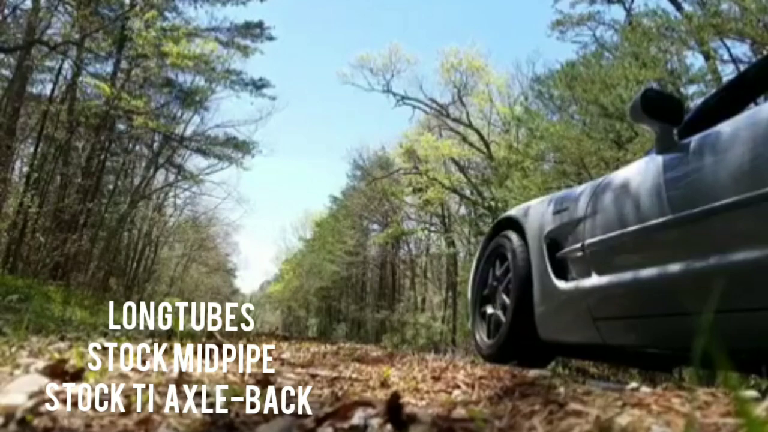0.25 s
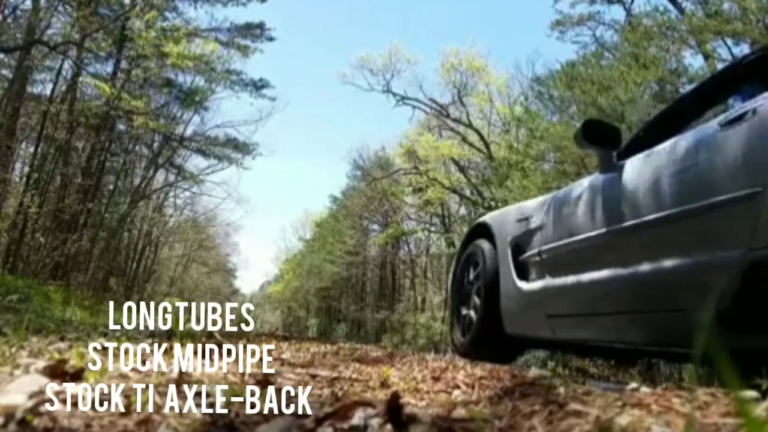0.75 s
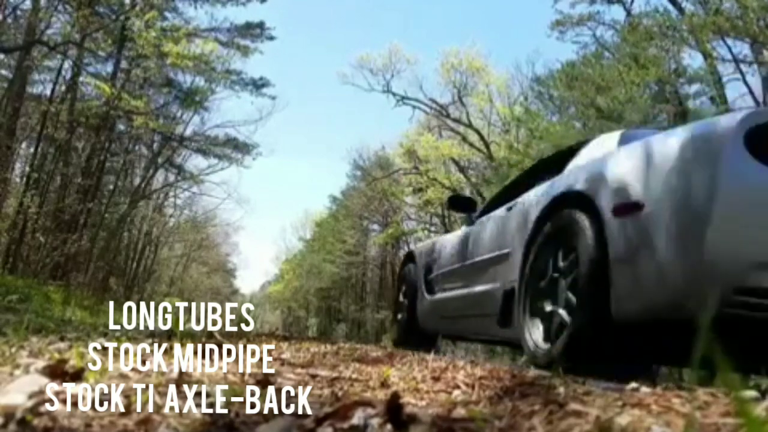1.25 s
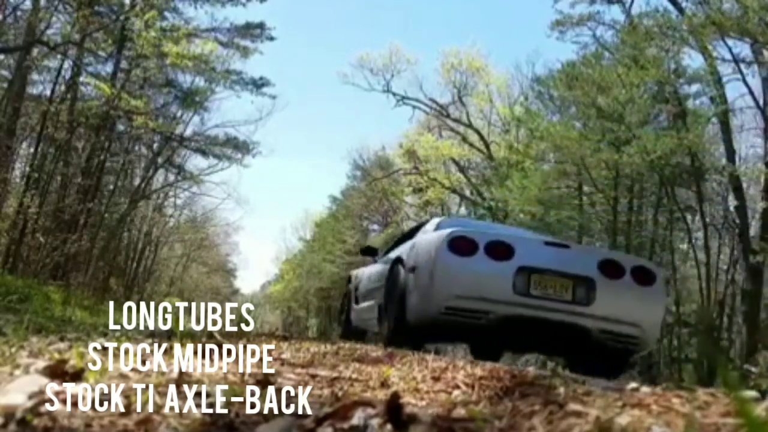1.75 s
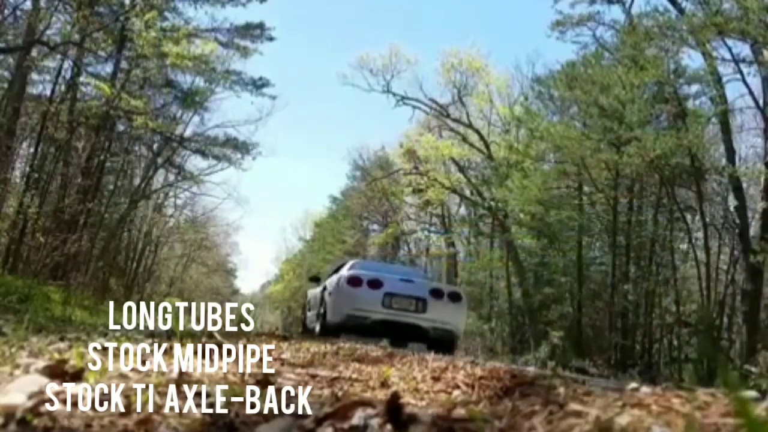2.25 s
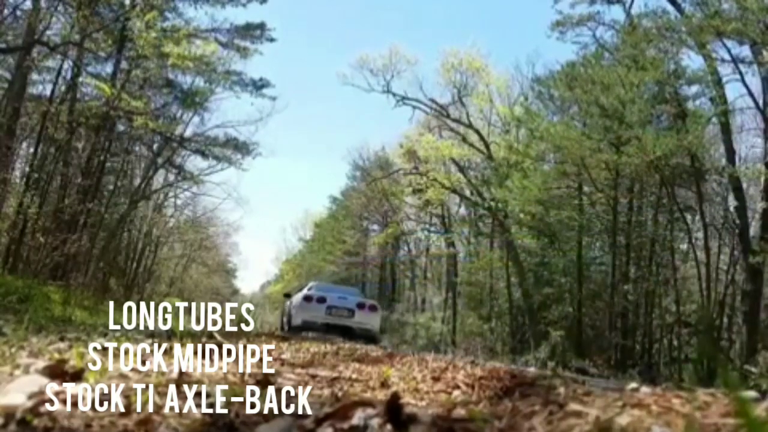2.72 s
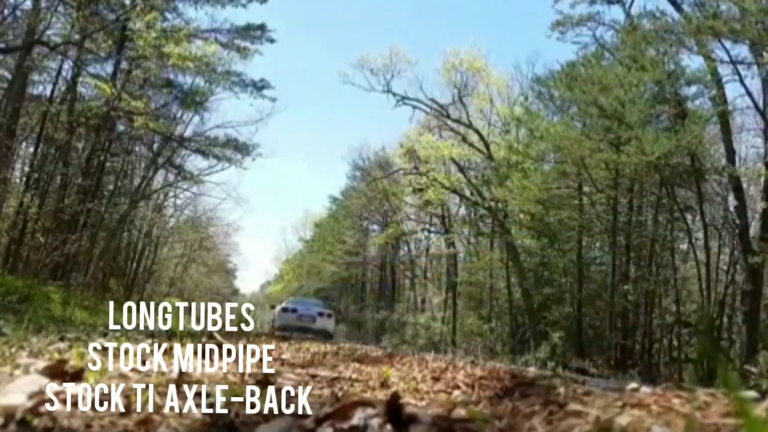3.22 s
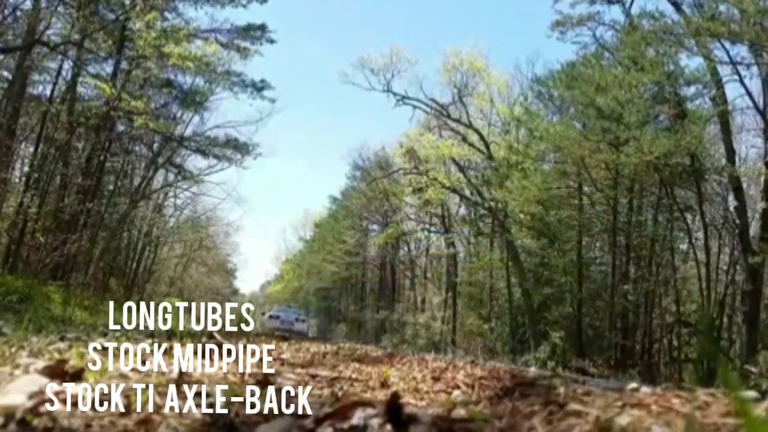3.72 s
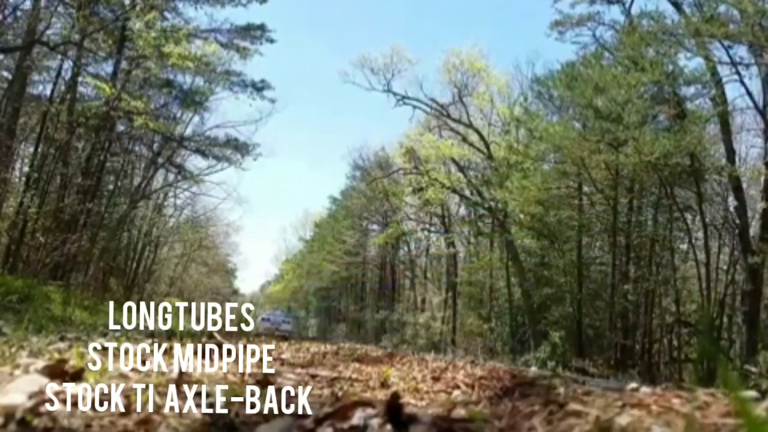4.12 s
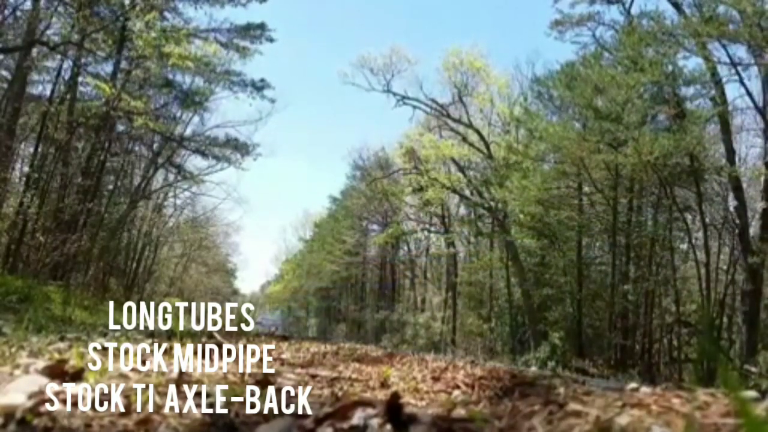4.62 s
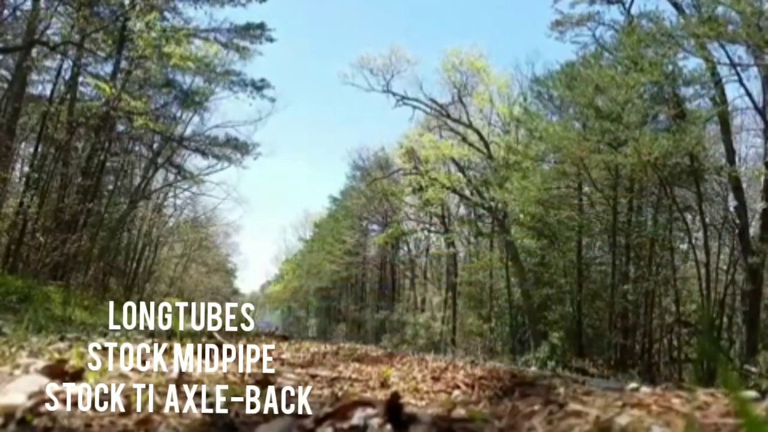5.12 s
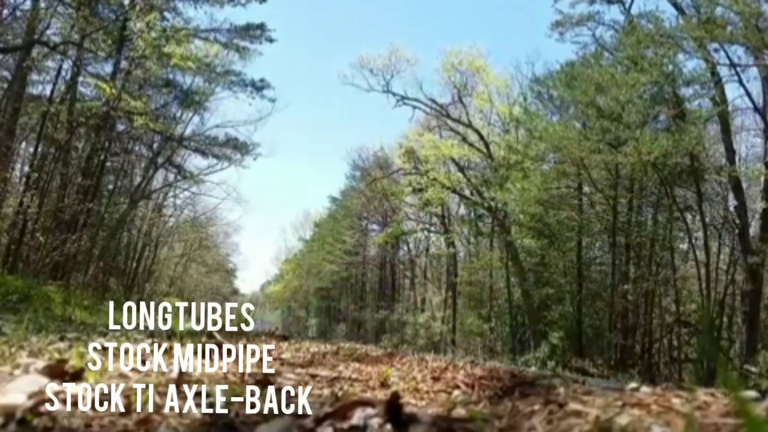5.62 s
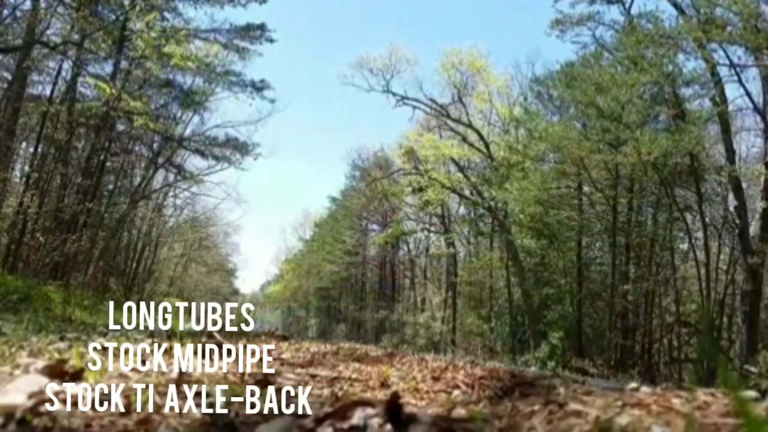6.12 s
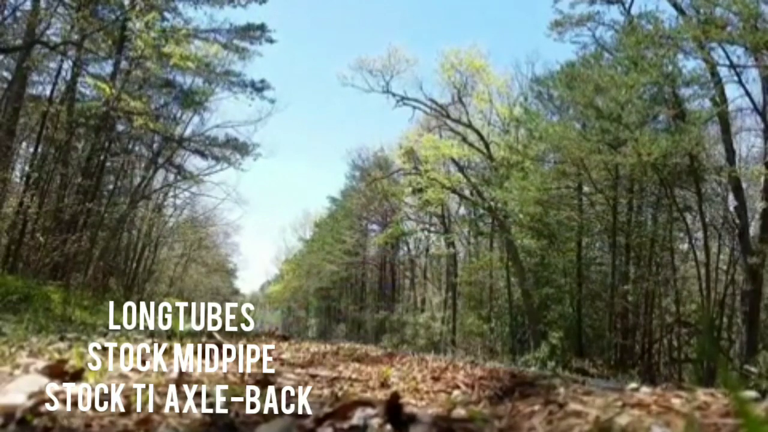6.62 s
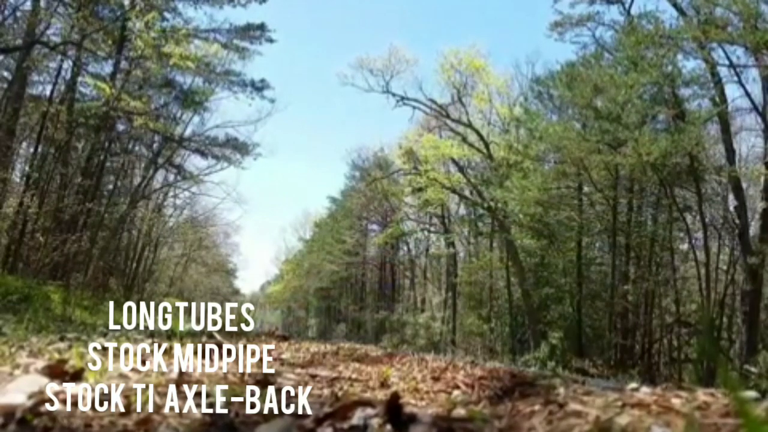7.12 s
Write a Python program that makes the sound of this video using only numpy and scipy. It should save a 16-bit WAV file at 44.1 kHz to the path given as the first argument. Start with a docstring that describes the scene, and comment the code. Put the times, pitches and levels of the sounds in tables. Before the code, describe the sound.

Grit crunches as a raspy V8 car launches close by, revs high, chirps its tyres on an upshift and roars on into the distance.

```python
"""Sports car leaving a wooded verge

A V8 rolls off the grit beside a stereo microphone on the ground and accelerates away down the road.
It revs out, shifts up with a few tyre chirps, pulls again, then shifts and runs on at lighter throttle.
The exhaust is a stack of engine orders gliding through pipe resonances, with rough, pulsing gas noise.
Tyres roar and hiss, grit crunches, a few sharp ticks sound at the start and the trees answer faintly."""
import sys
import numpy as np
from scipy import signal
from scipy.fft import rfft, irfft, next_fast_len
from scipy.io import wavfile
from scipy.ndimage import uniform_filter1d, minimum_filter1d, map_coordinates

SR = 44100
rng = np.random.default_rng(int(sys.argv[2]) if len(sys.argv) > 2 else 0)


def wrap_up_sound(samples):
    """Save the sound to the file named by the first command line argument, as 16-bit audio."""
    columns = np.atleast_2d(samples).T
    # keep every value between -1 and 1, then stretch to whole-number steps
    tamed = np.clip(columns, -1, 1)
    steps = np.round(tamed * 32767).astype(np.int16)
    wavfile.write(sys.argv[1], SR, steps)


N = 324727
TIME = np.arange(N) / SR


# the exhaust at the microphone, relative levels: (time [s], firing tones [dB], burble [dB], rasp [dB])
EXHAUST_LEVELS = [(0, -46.5, -56, -27.5), (.18, -31.5, -53.5, -23.5), (.28, -30.5, -55.5, -20),
                  (.47, -31.5, -40, -15.5), (.85, -32.5, -44, -18.5), (1.3, -24.5, -45.5, -16),
                  (1.47, -22.5, -46.5, -16.5), (1.58, -26, -37.5, -15), (1.9, -21.5, -43.5, -11),
                  (2.48, -22, -43.5, -14), (2.85, -20, -27, -18.5), (3.5, -22.5, -20, -12),
                  (4.03, -20, -21.5, -14), (4.4, -22, -27.5, -12), (5.05, -24, -25, -13),
                  (6.18, -19.5, -25, -14.5), (6.48, -22, -34, -12.5), (6.75, -17.5, -34.5, -16),
                  (7.36, -20, -36, -13.5)]
def exhaust(cycle, firing_hz, ragged, pull, shut, jolt):
    """Engine orders plus a puff of gas at every firing; ragged running trades pitched rasp for noise."""
    tone_db, burble_db, rasp_db = curves(EXHAUST_LEVELS)
    levels_db = tone_levels(tone_db, firing_hz, pull, shut, jolt)
    burble, rasp = cylinder_orders(cycle, firing_hz / 8, ragged, pull, shut)
    gas = gas_pulses(cycle)
    tones = np.sqrt(2) * firing_tones(cycle, levels_db, ragged)
    pitched = amp(-1) * tones + amp(burble_db + 1.2) * burble
    pitched += amp(rasp_db - 2.16) * np.sqrt(1 - ragged) * rasp
    return pitched + amp(rasp_db + 1.44) * np.sqrt(ragged) * gas


def firing_tones(cycle, levels_db, ragged):
    """The eight firings of a cycle add up to a tone with two strong overtones."""
    rounding = np.pi / 2 * swell(2.9, 0.7)  # crossing the main resonance turns the overtones' phases
    out = np.zeros(N)
    for order, db in zip((8, 16, 24), levels_db):
        phase = order * cycle + pipe_phase(order) + rounding * (order / 8 - 1) ** 2
        out -= amp(db + ragged * wobble(33)) * np.cos(phase)
    return out


# how distant the car sounds from the verge: (time [s], distance [0-1])
DISTANCE = [(2.4, 0.17), (3.7, 0), (5.2, 0.32), (7.36, 0.85)]
# the firing tone and its overtones:
# (order [per cycle], level [dB], change at hard pull [dB], far off [dB], before the clutch takes [dB])
FIRING_HARMONICS = [(8, 0, 4.5, -5.5, -3), (16, -0.5, -5.5, 7.5, -3.5), (24, 0, 0, 2, 5.5)]
def tone_levels(level_db, firing_hz, pull, shut, jolt):
    """Each tone swells as it crosses a resonance; a shut throttle and a jolt weaken them all."""
    far, idling = curves(DISTANCE)[0], 1 - clutch_take_up()
    common_db = level_db - 9.5 * jolt - 3 * shut
    return [common_db + db + pipe_db(firing_hz * round(order / 8))
            + pull * pull_db + far * far_db + idling * idle_db
            for order, db, pull_db, far_db, idle_db in FIRING_HARMONICS]


# resonances of the exhaust pipe: (frequency [Hz], width [Hz], level [dB])
PIPE_RESONANCES = [(97, 93, 4.5), (142, 37, -6.5), (175, 34, 0), (200, 36, 1.5), (222.7, 11, 3),
                   (290.7, 57, 3), (327.5, 47, -4.5), (405, 50, 1), (470, 67, 4.5), (607, 60, 2.5),
                   (707, 122, 8), (796, 66, 3), (888, 63, -6)]
# cancellations between them: (frequency [Hz], width [Hz], depth [dB])
PIPE_NOTCHES = [(124, 9.8, 6), (244.15, 15, -1), (347, 7.3, 6)]
def pipe_db(hz):
    """The pipe lifts a tone near a resonance and sinks it in a notch."""
    power = sum((amp(db) / (1 + (2 * (hz - centre) / width) ** 2)) ** 2
                for centre, width, db in PIPE_RESONANCES)
    notch_db = sum(db * np.exp(-((hz - centre) / width) ** 2) for centre, width, db in PIPE_NOTCHES)
    return 10 * np.log10(power) - notch_db


def pipe_phase(order):
    """The cylinders reach the tailpipes with different phases: eight unlike pulses a cycle."""
    return np.pi * (order ** 2 / 8 + order ** 2 / 700 + 1 / 3)


# unequal cylinders: (order [per cycle], smooth running [dB], hard pull [dB], throttle shut [dB])
CYLINDER_LEVELS = [(2, -14, -8, -5), (3, 0, 2, 2.5), (4, -10, -3, 6), (5, 4.5, -12, -7.5),
                   (6, -2.5, 0.5, -2), (7, -6, -17, -14), (9, -21.5, -7, 0), (10, -7, -2, -12.5),
                   (11, -8, -2.5, -4), (12, -1.5, -0.5, 4), (13, -9, -4, -2), (14, 3, 1.5, -6.5),
                   (15, -7, -11, -2), (17, -22, -5.5, -2), (18, -3, -8, -9.5), (19, -4, -2.5, -7.5),
                   (20, 4, -10.5, -7), (21, -11.5, -11, -13.5), (22, 1, 0, -15), (23, -14, -4.5, -1.5),
                   (25, -16.5, -1, -12), (26, -2, -12.5, -3), (27, -5.5, 5, -4), (28, -2, -1, -4.5),
                   (29, -13.5, -6.5, -14.5), (30, 2.5, -7.5, -2.5), (31, 3, -0.5, -13.5)]
# an order drones through a resonance: (time [s], half length [s], order [per cycle], gain [dB])
ORDER_DRONES = [(2.402, 0.3, 30, 6.5), (2.3, .15, 32, 3), (3.275, .1, 5, 15), (4.652, 0.16, 19, 0.5),
                (5.033, 0.12, 23, 10.5), (5.403, .2, 14, 3), (5.848, 0.28, 18, 7), (5.85, 0.34, 4, 5.5)]
# where the microphone lies from the car: (time [s], beside [0-1], close behind [0-1], far behind [0-1])
PERSPECTIVE = [(0, 1, 0, 0), (.85, 1, 0, 0), (1.25, .5, .5, 0), (1.55, 0, 1, 0), (2.3, 0, 1, 0),
               (3, 0, 0, 1)]
# exhaust colour from each of those three places: (frequency [Hz], level [dB])
COLOUR_BESIDE = [(40, -47.5), (130, -9.5), (220, -15), (310, -5.5), (390, -5.5), (490, -3), (560, -7.5),
                 (680, 1), (800, -2.5), (980, -19), (1500, -27.5), (3000, -61)]
COLOUR_CLOSE_BEHIND = [(60, -51), (160, -7.5), (280, -11.5), (370, -10.5), (465, -2), (555, -12.5),
                       (650, -2), (725, -5), (825, 2), (900, -6.5), (980, -5.5), (1070, -6.5), (1260, -33),
                       (2000, -29), (4000, -71.5)]
COLOUR_FAR_BEHIND = [(60, -43.5), (160, -15.5), (380, -12.5), (455, -3.5), (545, -12.5), (620, -3),
                     (720, -6), (820, -3), (930, -8), (1070, -14), (1250, -31.5), (2000, -45), (4000, -76)]
EXHAUST_COLOURS = (COLOUR_BESIDE, COLOUR_CLOSE_BEHIND, COLOUR_FAR_BEHIND)
# ground and trees between the distant car and the microphone: (frequency [Hz], gain [dB])
GROUND_COLOUR = [(420, -1), (530, -1.5), (618, 6), (685, -7), (745, -0.5), (810, 0.5), (880, 2),
                 (1100, -5.5), (1400, 2.5)]
def cylinder_orders(cycle, cycle_hz, ragged, pull, shut):
    """Unequal cylinders make burble below the firing tone and rasp above it, each returned at rms 1."""
    far, places = curves(DISTANCE)[0], curves(PERSPECTIVE)
    pattern = {round(order): row for order, *row in CYLINDER_LEVELS}
    sound, power = np.zeros((2, N)), np.zeros((2, N))
    for order in range(2, 64):
        if order in (8, 16, 24):  # these are the firing tones
            continue
        is_rasp = int(order > 8)
        high_order_db = 3 if order % 8 == 0 else -7
        smooth_db, hard_db, shut_db = pattern.get(order, [high_order_db] * 3)
        db = smooth_db + pull * (hard_db - smooth_db) + shut * (shut_db - smooth_db) + 2.5 * wobble(6)
        db += sum(gain * swell(s, half_s) for s, half_s, k, gain in ORDER_DRONES if round(k) == order)
        if is_rasp:
            hz = order * cycle_hz
            db += sum(part * along(colour, hz) for part, colour in zip(places, EXHAUST_COLOURS))
            db += far * along(GROUND_COLOUR, hz)
        stumble = 2.05 * np.sqrt(ragged) * wobble(25)  # uneven firings shake the phase
        sound[is_rasp] -= amp(db) * np.cos(order * cycle + pipe_phase(order) + stumble)
        power[is_rasp] += amp(db) ** 2 / 2
    return sound / np.sqrt(power)


def gas_pulses(cycle):
    """Every firing sends a bang of chance size and a puff of turbulence down the pipes, which ring."""
    firings = np.diff(np.floor(8 * cycle / (2 * np.pi)), prepend=0)
    bangs = unit(firings * rng.choice([-1, 1], N) * amp(2.5 * rng.standard_normal(N)))
    puffs = unit(noise_pair(side_db=-16) * amp(4.5 * np.cos(8 * cycle) + 3.1 * np.cos(cycle)))
    flow = amp(-2) * bangs + amp(-1) * puffs
    return sum(part * ringing(flow, colour) for part, colour in zip(curves(PERSPECTIVE), EXHAUST_COLOURS))


# the clutch slips beside the microphone: (time [s], firing rate [Hz])
LAUNCH_REVS = [(0, 93), (.1, 95.9), (.3, 109), (.45, 128.7), (.69, 124.8), (.88, 109.3), (1.15, 107.7),
               (1.39, 93), (1.47, 103.9), (1.56, 129.2)]
# first gear, heading down the road: (time [s], firing rate [Hz])
FIRST_GEAR_REVS = [(1.72, 136.6), (1.84, 150.3), (2, 173.9), (2.3, 212.2), (2.76, 269.4), (3.22, 327.8),
                   (3.68, 376.8), (4.1, 418.4)]
# gear changes farther off: (foot lifts [s], clutch bites [s], firing rate then [Hz], slip ends [s],
# firing rate then [Hz], bend of the slip [1 = straight], initial climb in the new gear [Hz/s])
UPSHIFTS = [(4.115, 4.391, 376.2, 5.03, 336.8, .8, 55.97), (6.255, 6.46, 381, 6.77, 286.8, 2.1, 28)]
def engine_speed(drag_per_s=0.058, swing_hz=4, rocks_per_s=2.84, settle_s=0.41):
    """Firings per second: revs climb, sink with the foot off, then the clutch drags them down a gear."""
    hz = curves([*LAUNCH_REVS, *FIRST_GEAR_REVS])[0]
    for lift, bite, bite_hz, grip, grip_hz, bend, climb in UPSHIFTS:
        coasting = np.interp(TIME, [lift, bite], [np.interp(lift, TIME, hz), bite_hz])
        slipping = grip_hz + (bite_hz - grip_hz) * np.interp(TIME, [bite, grip], [1, 0]) ** bend
        age = np.maximum(TIME - grip, 0)
        driveline_rock = np.exp(-age / settle_s) * np.cos(2 * np.pi * rocks_per_s * age)
        in_gear = grip_hz + climb * age * (1 - drag_per_s * age) + swing_hz * (1 - driveline_rock)
        hz = np.select([TIME < lift, TIME < bite, TIME < grip], [hz, coasting, slipping], in_gear)
    return hz


def pedal(firing_hz, pull_from_hz=285, pull_full_hz=345, travel_s=0.012, delay_s=0.018, jolt_s=0.032):
    """Hard pull at high revs, shut throttle in the shifts and a jolt at each lift and return, all 0-1."""
    foot_off = [(lift, bite + delay_s) for lift, bite, *_ in UPSHIFTS]
    shut = sum(step(lift, travel_s) - step(back, travel_s) for lift, back in foot_off)
    jolt = sum(swell(lift, jolt_s) + swell(back, jolt_s) for lift, back in foot_off)
    pull = np.interp(firing_hz, [pull_from_hz, pull_full_hz], [0, 1]) * (1 - shut)
    return pull, shut, jolt


def clutch_take_up():
    """The clutch first loads the engine, from 0 to 1."""
    return step(0.38, rise_s=0.049)


def raggedness(firing_hz, shut, jolt, lug_hz=113.3):
    """Noise share of the combustion: high when the engine lugs and at jolts, slight with the foot off."""
    load = np.interp(clutch_take_up(), [0, 1], [0.4, 0.74])
    load *= 1 - 0.6 * swell(1.35, 0.2)  # the firing turns rounder as the revs sag
    lugging = load * np.minimum(1, lug_hz / firing_hz) ** 2.7
    return np.clip(0.03 + 0.88 * lugging + 0.57 * (jolt + 0.1 * shut), 0, 1)


# the throttle snaps shut or the clutch bites: (time [s], half length [s], depth [dB])
EXHAUST_DIPS = [(4.103, 0.02, 9.5), (6.238, 0.029, 6.5), (6.472, 0.012, 4)]
def shift_gain(bark_db=4.5, bark_after_s=0.054, bark_half_s=0.0097):
    """The exhaust dips at the gear changes and barks as each new gear takes the load."""
    dips_db = sum(db * swell(s, half_s) for s, half_s, db in EXHAUST_DIPS)
    barks_db = sum(bark_db * swell(bite + bark_after_s, bark_half_s) for _, bite, *_ in UPSHIFTS)
    return amp(barks_db - dips_db)


# down the road, the rear tyres hop as second gear bites:
# (time [s], half length [s], pitch [Hz], level [dB], pitch waver [share])
TYRE_HOPS = [(4.41, 0.017, 1344, -15, .035), (4.437, 0.013, 1243, -9, .015),
             (4.512, 0.021, 1273, -18.5, .08), (4.602, 0.022, 1310, -18, .08),
             (4.703, 0.018, 1420, -23, .1), (4.796, .02, 1321, -24, 0.095)]
def tyre_chirps():
    """Each hop of the tyres is a short, unsteady squeal over a broad scrub."""
    scrub_colour = [(800, -33.5), (1200, 4), (1450, -1.5), (1700, -13), (2400, -21), (4000, -53)]
    scrub = coloured(rng.standard_normal(N), scrub_colour)
    out = np.zeros(N)
    for s, half_s, hz, db, waver in TYRE_HOPS:
        squeal = np.sin(2 * np.pi * np.cumsum(hz * (1 + waver * wobble(300))) / SR)
        envelope = swell(s, half_s * np.where(TIME < s, 1, 1.1))  # falls a little slower than it rises
        out += amp(db + 1.9 * wobble(150)) * envelope * (squeal + amp(-7) * scrub)
    return out


# the car across the microphone's two ports: (frequency [Hz], left minus right [dB])
PORT_BALANCE = [(60, 4.5), (130, 5.5), (280, 2), (700, 1), (1500, 3.5), (8000, -6)]
# phase between the ports: (frequency [Hz], lead of the left [rad])
PORT_LEAD = [(50, -0.82), (120, -0.79), (260, -0.31), (700, -0.04)]
# the car crosses in front of the microphone: (time [s], lag of the left [ms])
PORT_LAG = [(0, 0.65), (1.25, 0.39), (1.7, 0.2), (2.2, -0.017), (3.3, 0.18), (4.5, 0.012), (7.36, -.03)]
def microphone_ports(pair):
    """The left port has louder, phase-shifted bass and hears the car later while it is to the right."""
    sides = np.array([[0.5], [-0.5]])
    def response(hz):
        return amp(sides * along(PORT_BALANCE, hz)) * np.exp(1j * sides * along(PORT_LEAD, hz))
    left, right = filtered(pair, response)
    n, half_lag = np.arange(N), curves(PORT_LAG)[0] * SR / 2000
    return np.array([np.interp(n - half_lag, n, left), np.interp(n + half_lag, n, right)])


# tyres and air from the verge, relative levels: (time [s], roar [dB], hiss [dB], rumble [dB])
ROAD_LEVELS = [(0, -53, -42, -52), (.25, -52.5, -42.5, -54.5), (.48, -43, -34, -58), (.68, -45.5, -38, -66),
               (.83, -48, -33, -61), (1.3, -43, -36.5, -51.5), (1.47, -41, -39, -55), (1.62, -36, -36, -58),
               (1.9, -38, -42.5, -77), (2.78, -39.5, -43, -61), (2.92, -42, -38.5, -61),
               (3.3, -38.5, -34.5, -44), (3.8, -34.5, -36, -47), (4.33, -38, -39, -44),
               (4.41, -34.5, -42.5, -51), (5.1, -35, -46.5, -53.5), (6.48, -40.5, -58.5, -52.5),
               (6.72, -48, -64.5, -54.5), (7.36, -45, -67, -59.5)]
# the colour of each at ground height: (frequency [Hz], level [dB])
ROAR_COLOUR = [(60, -26), (150, -2), (600, 9), (1300, 5.5), (1900, -3), (2600, -14), (3500, -23.5),
               (6000, -27.5), (10000, -52)]
HISS_COLOUR = [(900, -10.5), (2000, 1.5), (3000, -4.5), (3800, -5), (4700, -3.5), (6400, -1.5),
               (7200, -1.5), (8300, 5), (9000, -4), (9800, -23)]
RUMBLE_COLOUR = [(10, -17), (25, -12.5), (50, 1.5), (80, 2.5), (200, -18.5), (600, -63.5)]
def road_noise(cycle, jolt, scuff_db=1):
    """Tyres and moving air roar, hiss and rumble; the tyres scuff at each jolt."""
    roar_db, hiss_db, rumble_db = curves(ROAD_LEVELS)
    roar = coloured(noise_pair(side_db=-12.5) * amp(3.4 * np.cos(8 * cycle)), ROAR_COLOUR)
    hiss = coloured(noise_pair(side_db=1.5), HISS_COLOUR)
    hiss *= amp(1.4 * np.array([wobble(45), wobble(45)]))
    tyres = amp(roar_db + 9.5) * roar + amp(hiss_db + 3) * (hiss + grit())
    rumble = coloured(noise_pair(side_db=-3), RUMBLE_COLOUR) * amp(3 * wobble(15)) * amp([[2], [-2]])
    return amp(scuff_db * jolt) * tyres + amp(rumble_db + 4) * rumble


# loose verge near the microphone: (time [s], level against the hiss [dB])
GRIT_LEVELS = [(0, 5), (.5, 3), (.72, 1.5), (.83, 3.5), (.95, 1.5), (1.4, -1.5), (2.1, 5.5), (2.6, -8.5),
               (7.36, -40)]
def grit(stones_per_s=450, spread_db=1.5, clump_db=3):
    """Clumps of stones of unequal size crunch under the tyres."""
    sizes = amp(spread_db * rng.standard_normal((2, N)) + clump_db * wobble(45))
    stones = (rng.random((2, N)) < stones_per_s / SR) * rng.choice([-1, 1], (2, N)) * sizes
    colour = [(700, -23.5), (1400, 3), (2400, 5), (3000, 5.5), (5000, -13.5), (8500, -5.5), (10000, 4.5)]
    return amp(curves(GRIT_LEVELS)[0]) * coloured(stones, colour)


# ticks while the car is close to the microphone: (time [s], relative level [dB])
SHARP_TICKS = [(0.4093, -22.5), (0.4986, -24), (0.614, -27), (0.9697, -24.5), (1.0438, -22), (1.3014, -26),
               (1.3433, -20), (1.3723, -26.5)]
def sharp_ticks(decay_s=0.0027, gain_db=-5):
    """Short, bright ticks and pops as the car pulls away."""
    envelope = sum(amp(db + gain_db) * (TIME >= s) * np.exp(-np.abs(TIME - s) / decay_s)
                   for s, db in SHARP_TICKS)
    colour = [(700, -26), (2000, -3), (4500, -4.5), (8500, 5), (10000, -8)]
    return envelope * coloured(noise_pair(side_db=-7.5), colour)


# the woods around the microphone: (frequency [Hz], time to fall 60 dB [s])
WOODS_DECAY = [(100, 1), (700, 0.56), (3000, 0.22), (9000, 0.31)]
def woods_echo(car, smear_hz=12):
    """Trunks on both sides of the road scatter a wide tail, which the car's motion smears into a roar."""
    hz, t, spectra = signal.stft(rng.standard_normal((2, SR)), SR, nperseg=256)
    decay = amp(-60 * t / along(WOODS_DECAY, hz)[:, None])
    mid, side = signal.istft(spectra * decay, SR, nperseg=256)[1]
    tail = np.array([amp(0.5) * mid + side, amp(5) * mid - side]) / np.linalg.norm(side)
    scattered = filtered(car.mean(axis=0), lambda f: amp(along([(150, -8), (400, -16), (900, 1)], f)))
    return signal.fftconvolve((scattered * wobble(smear_hz))[None], tail, axes=1)[:, :N]


def amp(db):
    """Decibels to amplitude."""
    return 10 ** (np.asarray(db) / 20)


def unit(x):
    """x at rms 1."""
    return x / np.sqrt(np.mean(x ** 2) + 1e-20)


def along(points, hz):
    """(Hz, value) points read on a log axis."""
    f, values = np.transpose(points)
    return np.interp(np.log(hz + 1), np.log(f + 1), values)


def curves(rows):
    """One value per sample for each column after the time."""
    s, *columns = np.transpose(rows)
    return [np.interp(TIME, s, column) for column in columns]


def step(s, rise_s):
    """A smooth switch from 0 to 1 around time s."""
    return 0.5 + 0.5 * np.tanh((TIME - s) / rise_s)


def swell(s, half_s):
    """A smooth bump of height 1 around time s."""
    return np.exp(-((TIME - s) / half_s) ** 2)


def wobble(rate):
    """A smooth random curve, rate knots a second."""
    coarse = np.arange(0, N + 64, 64)
    knots = rng.standard_normal(int(N * rate / SR) + 4)
    return np.interp(np.arange(N), coarse, map_coordinates(knots, [coarse * rate / SR]))


def noise_pair(side_db):
    """Stereo white noise of a given width."""
    mid, side = rng.standard_normal((2, N))
    return np.array([mid + amp(side_db) * side, mid - amp(side_db) * side])


def filtered(x, response):
    """x through a complex response of frequency."""
    size = next_fast_len(N + SR // 2)
    return irfft(rfft(x, size) * response(np.fft.rfftfreq(size, 1 / SR)), size)[..., :N]


def coloured(x, colour):
    """x with a (Hz, dB) colour, at rms 1."""
    return unit(filtered(x, lambda hz: amp(along(colour, hz))))


def ringing(x, colour):
    """x rings a minimum-phase body with a (Hz, dB) colour, at rms 1."""
    def response(hz):
        cepstrum = irfft(np.log(amp(along(colour, hz))))
        return np.exp(rfft(2 * cepstrum[:len(cepstrum) // 2], len(cepstrum)))
    return unit(filtered(x, response))


def scene():
    """The car, its echo in the trees and its road noise, heard from the verge."""
    speed_hz = engine_speed()
    pull, shut, jolt = pedal(speed_hz)
    ragged = raggedness(speed_hz, shut, jolt)
    firing_hz = speed_hz * (1 + 0.00798 * np.sqrt(ragged) * wobble(60))
    cycle = 2 * np.pi * np.cumsum(firing_hz / 8) / SR  # phase: one turn per eight firings
    car = exhaust(cycle, firing_hz, ragged, pull, shut, jolt) * shift_gain() + tyre_chirps()
    return microphone_ports(car) + amp(-13) * woods_echo(car) + road_noise(cycle, jolt) + sharp_ticks()


def record(dry, ceiling=0.92, top_hz=9650):
    """Behind the microphone, a limiter holds the highest peaks and a band limit cuts the top treble."""
    needed = np.minimum(1, ceiling / (np.abs(dry).max(axis=0) + 1e-9))
    gain = uniform_filter1d(minimum_filter1d(needed, size=441), size=441)
    return filtered(dry * gain, lambda hz: hz < top_hz)


dry = scene()
out = record(dry)
wrap_up_sound(out)
```